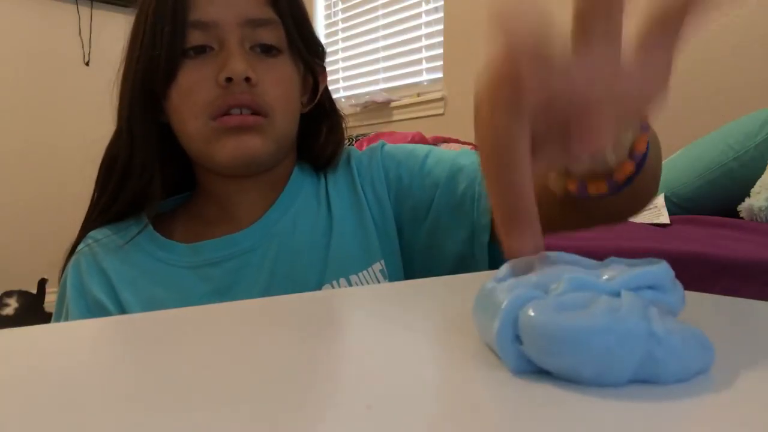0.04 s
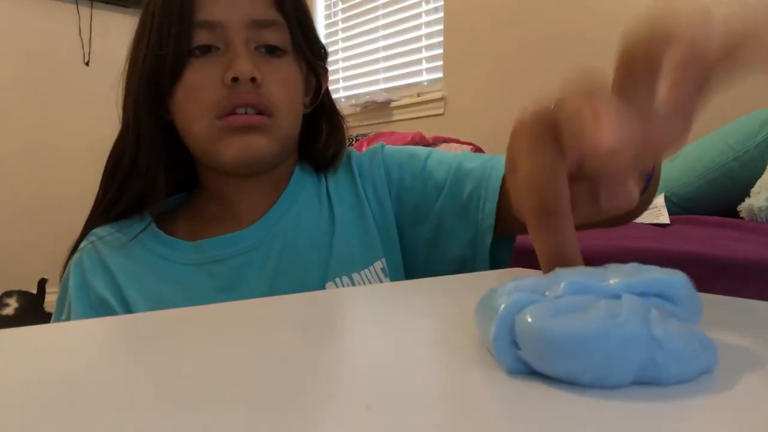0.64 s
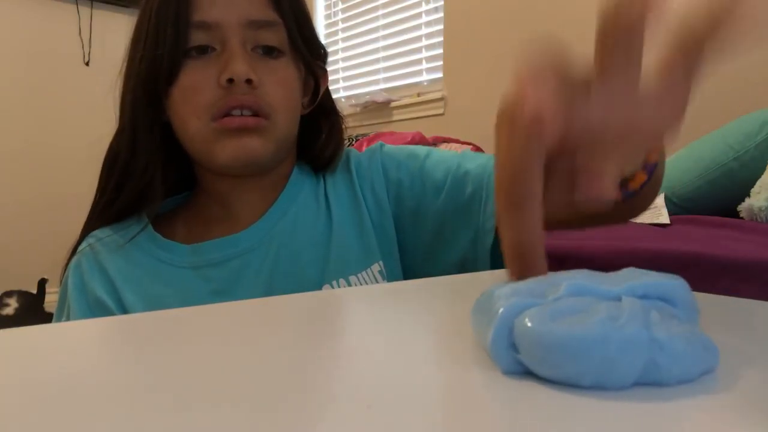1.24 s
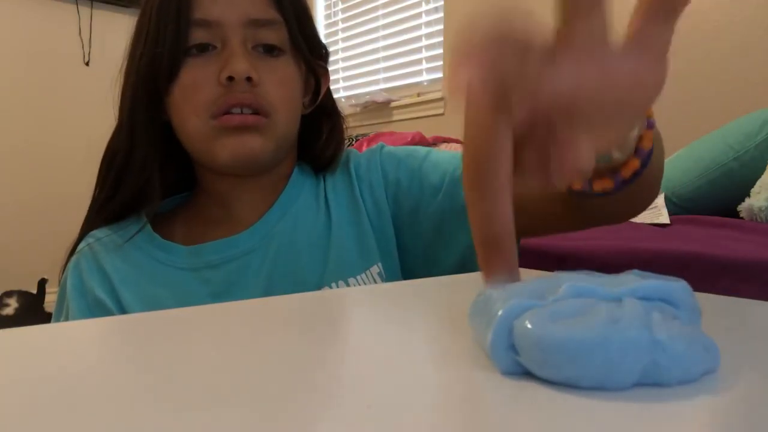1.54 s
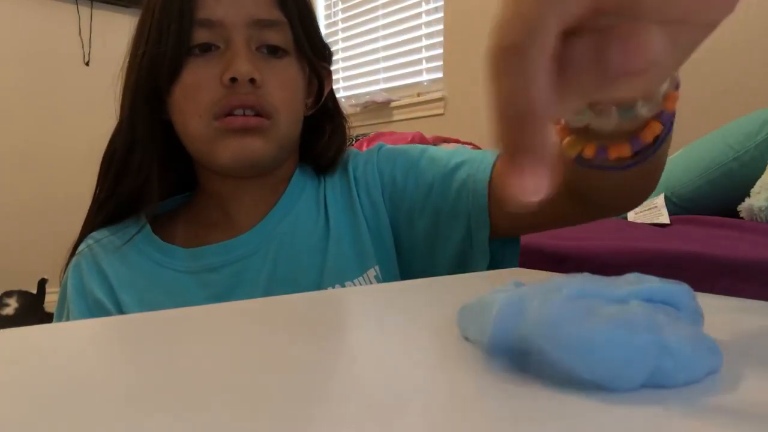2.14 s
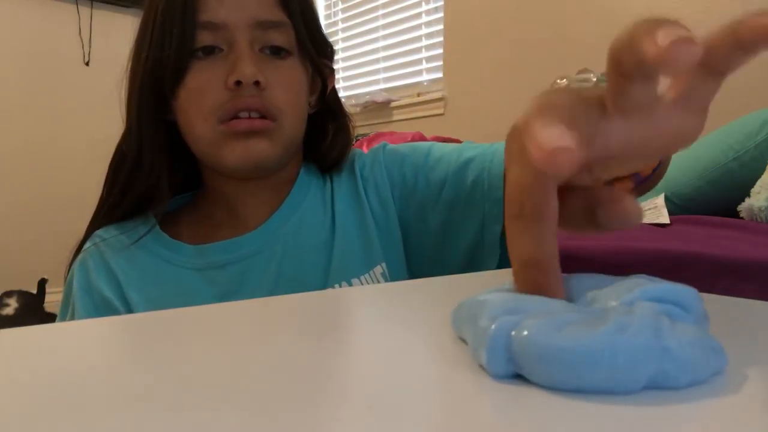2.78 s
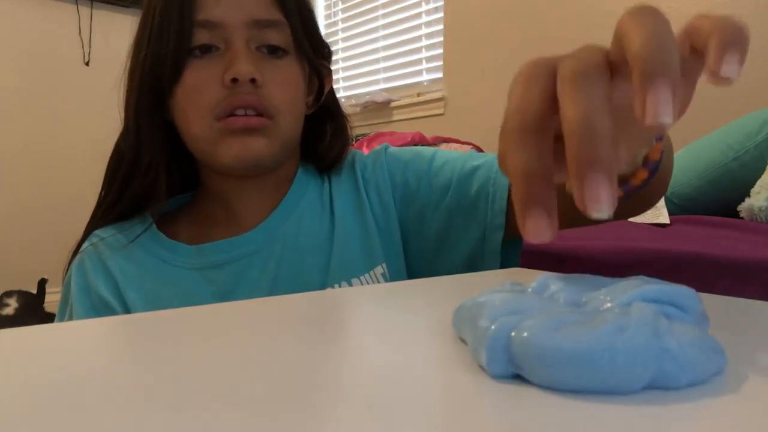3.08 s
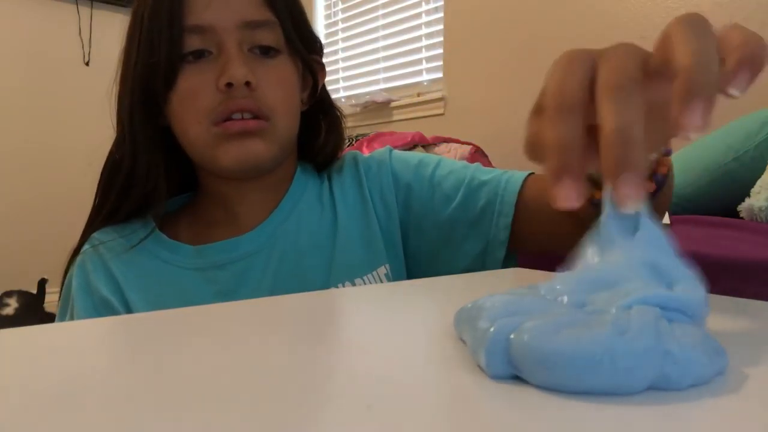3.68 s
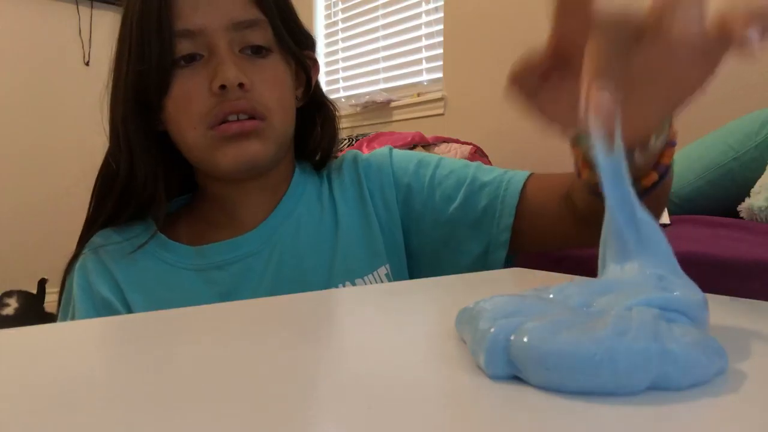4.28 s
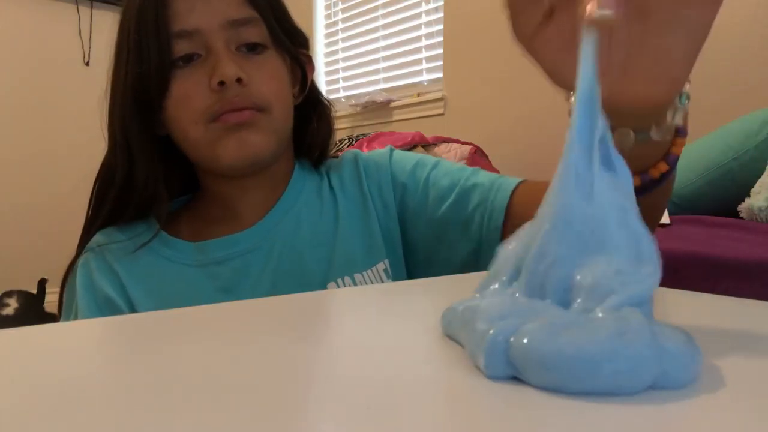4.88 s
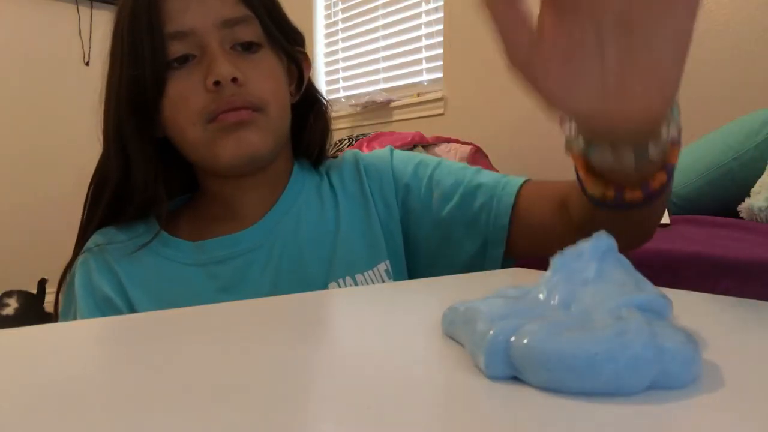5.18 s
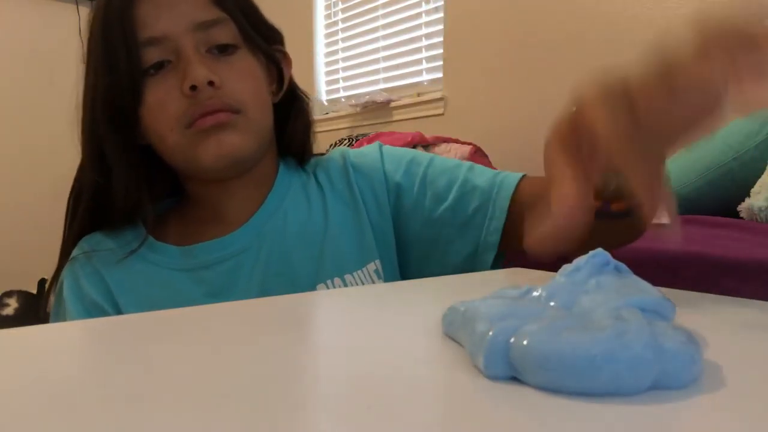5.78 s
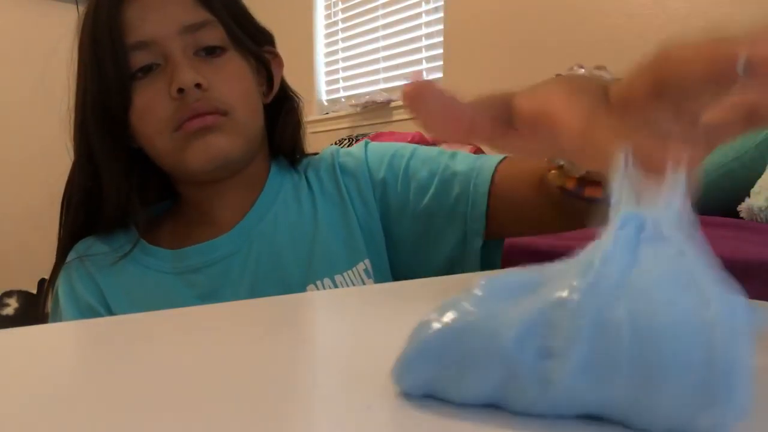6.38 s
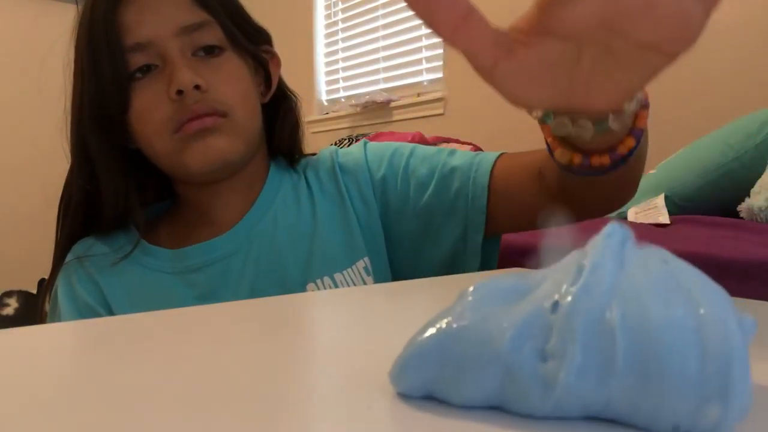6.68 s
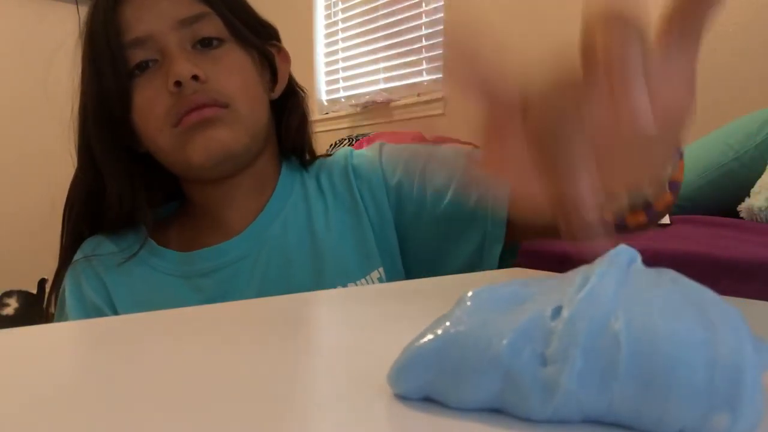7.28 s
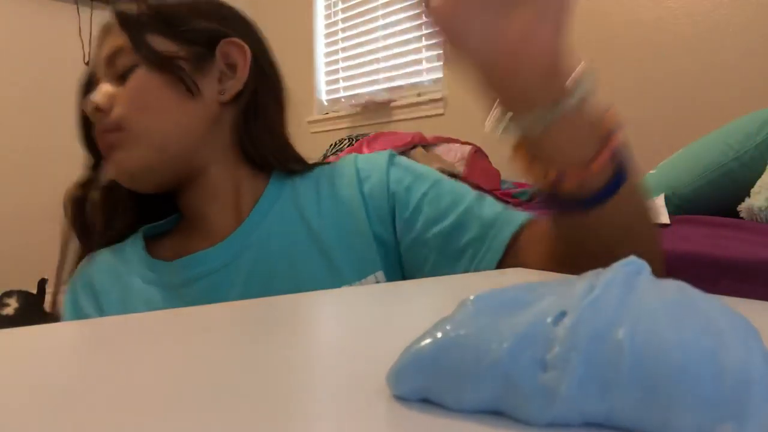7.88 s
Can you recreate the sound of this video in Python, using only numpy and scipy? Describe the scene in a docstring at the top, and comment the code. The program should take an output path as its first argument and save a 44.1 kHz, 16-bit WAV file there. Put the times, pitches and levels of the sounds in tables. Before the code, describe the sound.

Close to one microphone in a small, quiet bedroom, slime clicks and pops as fingers press in and pull away, each tug thudding softly into the table. A short wet smack and the brightest snaps come in the first two seconds. Softer pops, tiny ticks of breaking threads and delicate peeling crackle follow, thinning out toward the end over a faint hiss.

```python
"""Sticky slime, poked and pulled by hand on a table, close to one microphone in a small, quiet bedroom.
Each time the slime lets go, its skin snaps, an air pocket pops with a falling pitch and the tug thuds
into the table top; pokes only thud. Thin threads tick as they break, peeling slime crackles finely and
one wet smack hisses. The room answers with a short tail, over faint rumble and microphone hiss."""
import sys
import numpy as np
from scipy import signal
from scipy.fft import rfft, irfft, next_fast_len
from scipy.io import wavfile

SR = 44100
rng = np.random.default_rng(int(sys.argv[2]) if len(sys.argv) > 2 else 0)


def put_to_file(sound):
    """Save the sound as 16-bit audio at rate SR, in the file named by the first command-line argument."""
    columns = np.atleast_2d(sound).T  # one column per channel
    safe = np.clip(columns, -1, 1)
    whole_steps = np.round(safe * 32767)
    wavfile.write(sys.argv[1], SR, whole_steps.astype(np.int16))


N = 359018
T = np.arange(N) / SR
SMACK_S = 0.2456  # moment the wet smack bursts, in seconds

# The slime lets go; each layer adds its own gain to these levels:
# start_s, pop_db, pop_start_hz, pop_cycles_to_peak, tug_db, tug_start_hz, snap_db, snap_centre_hz
RELEASES = [(0.0538, -40.5, 1000, 1.5, -37, 424, -19, 3530),
            (0.2447, -17.5, 2249, 1.3, -68, 420, -27, 5100), (0.2846, -43, 700, 2.4, -33, 450, -15.5, 4800),
            (0.564, -29, 1455, 1.66, -26.5, 398, -7, 6140),
            (0.8015, -41.5, 1038, 0.63, -42, 460, -48, 2724),
            (1.0975, -40.5, 1920, 0.78, -32, 406, -32, 6830), (1.141, -42, 1030, 0.69, -72, 423, -48, 2600),
            (1.209, -34, 1000, 0.41, -50.5, 288, -44.5, 2600),
            (1.2894, -46, 1890, .6, -50.5, 500, -41.5, 3800),
            (1.386, -30, 2800, 1.15, -41.5, 453, -30.5, 2350),
            (1.6624, -22, 1050, 0.41, -29.5, 392, -6.5, 8000),
            (1.7575, -34, 850, 1.1, -32.5, 460, -36.5, 2370),
            (1.9159, -18.5, 1620, 0.99, -31, 373, -9.5, 3050),
            (2.0103, -41.5, 847, 1.37, -34.5, 408, -53, 2290),
            (2.1817, -33, 950, 0.34, -36.5, 358, -33.5, 4380),
            (2.269, -51, 2400, 0.91, -45.5, 262, -48, 2600),
            (2.4707, -46.5, 920, 1.2, -33.5, 338, -41, 2570),
            (2.6918, -39.5, 1020, 0.28, -55, 337, -43, 3000),
            (2.7348, -39.5, 1310, 0.48, -34.5, 457, -33.5, 6360),
            (2.9824, -45.5, 1340, 0.8, -40.5, 475, -43, 5200),
            (3.5815, -24, 1640, 0.86, -46.5, 378, -28.5, 2490),
            (3.6184, -30, 1060, 0.61, -29.5, 390, -38, 2670),
            (4.468, -50.5, 2300, 0.59, -53.5, 420, -41, 3040),
            (4.57, -35.5, 2240, 0.98, -41, 371, -43, 2480), (4.8248, -33, 1570, 1.3, -45, 341, -30.5, 3000),
            (5.0817, -37, 2440, 0.2, -50, 334, -45.5, 3200),
            (5.221, -47, 1070, 1.03, -46.5, 320, -44.5, 4080),
            (5.5792, -38, 2100, 1.07, -33, 427, -28.5, 3310),
            (6.0495, -48, 2600, 0.92, -41.5, 488, -41, 3400),
            (6.421, -33.5, 810, 0.33, -53, 502, -30.5, 2486), (7.1607, -63, 883, 2.1, -65, 403, -38, 7000),
            (7.46, -57.5, 1184, 2.2, -66.5, 405, -51.5, 3000),
            (7.7902, -47.5, 1185, 0.93, -48.5, 272, -34.5, 4060)]


def pops(gain_db=4.0, widening_hz=6530):
    """Air pockets open one by one, too small to radiate bass; the smallest widen and fall fastest."""
    out = np.zeros(N)
    for start_s, level_db, hz, cycles, *_ in RELEASES:
        add(out, start_s, undb(level_db + gain_db) * chirp(T[:SR // 20], hz, hz / widening_hz, cycles))
    return high_pass(out, 170, order=2)


def thuds(gain_db=3.0, ring_db=-0.5, tug_lag_s=0.001658, ring_lag_cycles=1.25, build_s=.002):
    """Each tug or poke is a low falling blip, and the table top rings on after it."""
    # Modes of the table top: pitch_hz, level_db, t60_s
    table_modes = [(103, -24, .2), (140, -24, .14), (178, -20, .12), (213, -9.5, .15), (275, -17, .12),
                   (303, -21, .1), (361, -4, .115)]
    # A fingertip presses in: start_s, level_db, start_hz
    pokes = [(0.722, -41, 285), (0.848, -46.5, 277), (1.3996, -36, 416), (1.57, -36.5, 299),
             (1.8254, -39.5, 280), (2.3714, -27.5, 296), (2.459, -40.5, 390), (2.636, -47.5, 242),
             (3.611, -37.5, 390), (4.7645, -46.5, 370), (5.1856, -45, 553), (5.505, -41.5, 312),
             (5.5939, -35, 505), (5.984, -48, 392)]
    t, out = T[:SR // 3], np.zeros(N)
    mode_hz, mode_db, t60 = np.transpose(table_modes)
    envelopes = undb(mode_db[:, None] - 60 * t / t60[:, None]) * (1 - np.exp(-t / build_s))
    modes = envelopes * np.sin(2 * np.pi * mode_hz[:, None] * t)
    tugs = [(s + tug_lag_s, tug_db, hz) for s, _, _, _, tug_db, hz, _, _ in RELEASES]
    for start_s, level_db, hz in tugs + pokes:
        add(out, start_s, undb(level_db + gain_db) * chirp(t, hz, fall=0.37, cycles=.85, tail=3.0))
        # the modes that the blip falls through take over after its first swing
        swept = 1 / (1 + (mode_hz / hz) ** 10)
        add(out, start_s + ring_lag_cycles / hz, undb(level_db + ring_db) * swept @ modes)
    return high_pass(out, 75, order=4)


def snaps(gain_db=-4.5, lead_s=0.00025, strain_s=.0015, snap_s=0.00041, crack_s=0.00043, fray_s=0.0024):
    """Skin or a thread strains, snaps within a millisecond with a bright crack, and frays briefly."""
    # A lone thread of slime breaks: start_s, level_db, centre_hz
    threads = [(0.586, -17, 7000), (0.7955, -35, 5600), (1.396, -26.5, 9130), (1.68, -29.5, 5930),
               (2.1868, -27, 2700), (2.2004, -41.5, 3300), (2.4528, -45, 4200), (2.72, -31, 4390),
               (2.726, -31, 5300), (3.6432, -33.5, 2930), (4.4807, -42, 5000), (4.603, -33.5, 9000),
               (5.1959, -33, 8050), (5.607, -30.5, 3600), (6.3855, -37.5, 7300), (6.7728, -42, 3760)]
    skins = [(s - lead_s, snap_db, hz) for s, *_, snap_db, hz in RELEASES]
    t, out = T[:SR // 40] - T[SR // 200], np.zeros(N)
    strain = undb(-20) * np.exp(-abs(t) / strain_s)
    fray = undb(-14) * np.exp(-abs(t) / fray_s)
    snap_envelope = np.where(t < 0, strain, fray + np.exp(-abs(t) / snap_s))
    crack_envelope = np.where(t < 0, strain, fray + np.exp(-abs(t) / crack_s))
    for start_s, level_db, hz in skins + threads:
        body_noise, crack_noise = rng.standard_normal((2, len(t)))
        body = unit(resonate(body_noise * snap_envelope, hz, 0.55 * hz))
        crack = unit(high_pass(crack_noise * crack_envelope, 11500, order=2))
        # higher and harder snaps carry more crack
        crack_db = -11.5 + 10.5 * np.log2(hz / 4000) + 0.2 * (level_db + 30)
        tick = body + undb(crack_db) * crack
        add(out, start_s + t[0], undb(level_db + gain_db) * tick / np.abs(tick).max())
    return out


def peels(scatter_db=2.0, count=340):
    """Swarms of tiny bubbles open, each bubble with its own pitch, a few louder than the rest."""
    # Slime peels off skin or table: middle_s, half_length_s, level_db, centre_hz, spread_octaves
    swarms = [(0.604, 0.025, -53, 9200, 0.63), (1.12, 0.024, -56.5, 1980, 1.57),
              (1.394, 0.012, -42, 1100, 0.31), (2.201, .014, -51, 3620, 0.22),
              (2.202, 0.021, -57.5, 7000, 1.1), (2.457, 0.0082, -50.5, 4560, 1.9),
              (2.979, .0092, -55.5, 3890, 1.58), (3.595, 0.013, -39, 810, 0.54),
              (3.634, 0.033, -56, 2540, 0.83), (4.587, 0.033, -51, 2410, 1.4),
              (4.671, 0.14, -64.5, 1944, 0.69), (4.904, 0.083, -67.5, 2050, 1.02),
              (5.189, 0.025, -53.5, 1470, 1.5), (5.59, 0.011, -50, 1840, 1.52),
              (6.047, 0.014, -52, 1650, 1.6), (6.189, .065, -54, 1270, 1.62),
              (6.393, 0.056, -64, 3580, 2.03), (6.601, .075, -70, 11700, .65),
              (7.69, 0.021, -64, 7200, .56), (7.754, 0.023, -54.5, 4980, 2.2)]
    gurgle = (SMACK_S + 0.013, .013, -35.5, 950, .25)  # bubbles opening behind the smack
    t, out = T[:SR // 80], np.zeros(N)
    for middle_s, half_s, level_db, centre_hz, octaves in [gurgle] + swarms:
        when, pitch = np.clip(rng.standard_normal((2, count)), -3, 3)
        hz = np.clip(centre_hz * 2 ** (octaves * pitch), 200, 16000)
        accent = undb(scatter_db * np.minimum(rng.exponential(size=count), 4))
        # high bubbles are shorter, so they need more height for the same energy
        height = np.sqrt(hz) * accent * rng.choice([-1, 1], count)
        bubbles = height[:, None] * chirp(t, hz[:, None], fall=0.14, cycles=1.1)
        starts = when * half_s / 2
        places = ((starts - starts.min()) * SR).astype(int)[:, None] + np.arange(len(t))
        swarm = np.bincount(places.ravel(), bubbles.ravel())
        swarm *= np.sqrt(half_s * SR) / np.linalg.norm(swarm)
        add(out, middle_s + starts.min(), undb(level_db) * swarm)
    return high_pass(out, 86, order=2)


def smack(shut_hz=6800, open_hz=10300, open_lead_s=0.0042):
    """Air is drawn into a wet gap, muffled while it is nearly shut and hardest as it bursts open."""
    # Resonances of the gap: centre_hz, width_hz, level_db
    gap_modes = [(4580, 540, -4), (5230, 900, -2), (5375, 550, -8), (6990, 180, -1), (7780, 800, -10),
                 (9115, 1300, -16), (820, 600, -5), (1596, 400, -14), (2740, 500, -13.5)]
    t, out = T[:SR // 6] - T[SR // 30], np.zeros(N)
    air = rng.standard_normal((len(gap_modes), SR // 4))
    hiss = sum(undb(level_db) * resonate(resonate(noise, hz, width), hz, width)
               for (hz, width, level_db), noise in zip(gap_modes, air))
    shut, wide = (unit(signal.sosfilt(signal.butter(8, hz, fs=SR, output="sos"), hiss)[-len(t):])
                  for hz in (shut_hz, open_hz))
    add(out, SMACK_S + t[0], np.where(t < -open_lead_s, shut, wide) * undb(smack_db(t)))
    return out


def smack_db(t, rise_db_per_s=2600, fade_db_per_s=330, burst_db_per_s=8994.5):
    """Air level t seconds from the burst: a rush rises, holds and fades, with the short burst on top."""
    rush = -35 - rise_db_per_s * np.maximum(-t - .011, 0) - fade_db_per_s * np.maximum(t - .036, 0)
    burst = -16.5 - burst_db_per_s * np.maximum(abs(t) - 0.0019, 0)
    return np.maximum(rush, burst)


def bedroom(x, wet_db, gap_s=0.0067, build_s=0.0045):
    """The microphone hears the direct sound, echoes off the table and nearby things, then a short tail."""
    # Nearby surfaces: delay_s, level_db
    echoes = [(.0014, -26.5), (.0031, -17.5), (.0062, -19)]
    # Bands of the diffuse tail: centre_hz, level_db, t60_s
    tail_bands = [(150, -14.5, 1), (440, -6, 0.14), (1092.4, -13, 0.33), (2500, -11.5, 0.317),
                  (5000, -15.5, 0.474), (9043, -10.5, 0.21), (14930, -9.5, 0.15)]
    t = T[:SR // 2]
    noise, response = rng.standard_normal(len(t)), np.zeros(len(t))
    log_centres = np.log([row[0] for row in tail_bands])
    for (_, level_db, t60), share in zip(tail_bands, np.eye(len(tail_bands))):
        envelope = undb(-60 * t / t60) * np.clip((t - gap_s) / build_s, 0, 1)
        band = colour(noise, lambda f: np.interp(np.log(f), log_centres, share))
        response += undb(level_db + wet_db) * band * envelope / np.linalg.norm(envelope)
    response[0] += 1  # direct sound
    # small surfaces only reflect the short waves
    reflection = high_pass(signal.unit_impulse(len(t)), 570, order=1)
    for delay_s, level_db in echoes:
        response += undb(level_db) * np.roll(reflection, int(delay_s * SR))
    return signal.fftconvolve(x, response)[:N]


def background(level_db=-67):
    """Faint room rumble and microphone hiss."""
    # Spectrum of the steady noise: frequency_hz, relative_db
    spectrum = [(15, -52), (25, -20), (38, -9.5), (59, -4.5), (123, -3.5), (190, -9.5), (217, -9),
                (335, -8.5), (451, -11), (607, -12), (659, -12.5), (1840, -23), (2000, -22.5), (6920, -24),
                (16000, -36.5)]
    hz, db = np.transpose(spectrum)
    noise = colour(rng.standard_normal(N), lambda f: undb(np.interp(np.log(f), np.log(hz), db)))
    return undb(level_db) * unit(noise)


def chirp(t, hz, fall, cycles, tail=1.34):
    """A cavity rings for a few cycles while it widens, so that its pitch falls."""
    turns = np.log1p(fall * hz * t) / fall
    swell = turns / cycles
    return swell * np.exp((1 - swell ** tail) / tail) * np.sin(2 * np.pi * turns)


def resonate(x, hz, width_hz):
    """A two-pole resonance with gain 1 at its centre."""
    hz, width_hz = min(hz, .45 * SR), min(width_hz, .4 * SR)
    return signal.lfilter(*signal.iirpeak(hz, hz / width_hz, SR), x)


def high_pass(x, hz, order):
    """Roll off what lies below hz."""
    return signal.sosfilt(signal.butter(order, hz, "high", fs=SR, output="sos"), x)


def colour(x, gain):
    """Filter by a gain that is a function of frequency."""
    size = next_fast_len(len(x))
    hz = np.maximum(np.fft.rfftfreq(size, 1 / SR), 1)
    return irfft(rfft(x, size) * gain(hz), size)[:len(x)]


def undb(db):
    """Decibels to gain."""
    return 10 ** (np.asarray(db) / 20)


def unit(x):
    """Scale to rms 1."""
    return x / np.sqrt(np.mean(x ** 2) + 1e-24)


def add(track, start_s, x):
    """Mix x into the track from start_s on."""
    i = int(np.clip(round(start_s * SR), 0, N - 1))
    track[i:i + len(x)] += x[:N - i]


def scene():
    """The slime in the bedroom, in mono, over the background; the smack stirs the room most."""
    slime = bedroom(pops() + thuds() + snaps() + peels(), wet_db=-1.0)
    return (slime + bedroom(smack(), wet_db=1.2) + background())[None]


def record(dry, bass_hz=35, top_hz=16200):
    """The microphone thins the deep bass and the recorder cuts the top."""
    thin = high_pass(dry, bass_hz, order=2)
    return signal.sosfilt(signal.ellip(10, .2, 80, top_hz, fs=SR, output="sos"), thin)


dry = scene()
out = record(dry)
put_to_file(out)
```